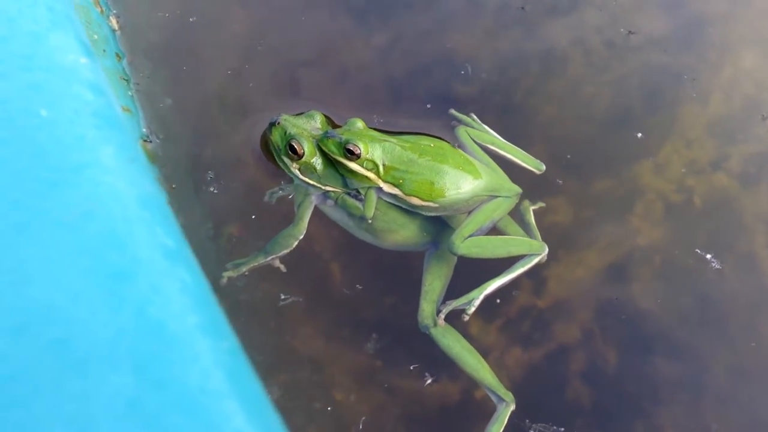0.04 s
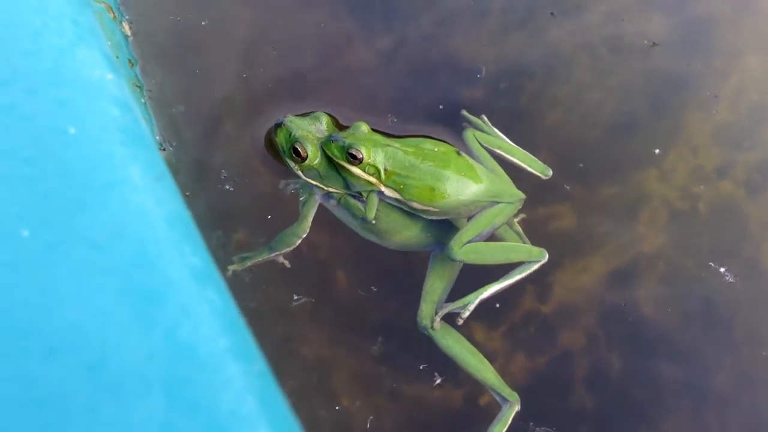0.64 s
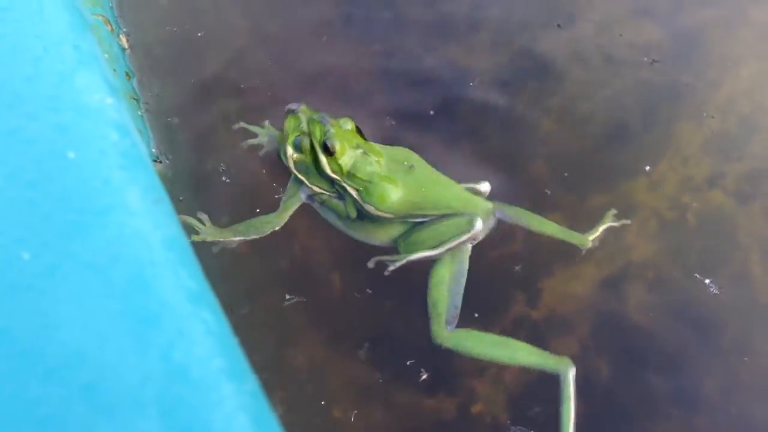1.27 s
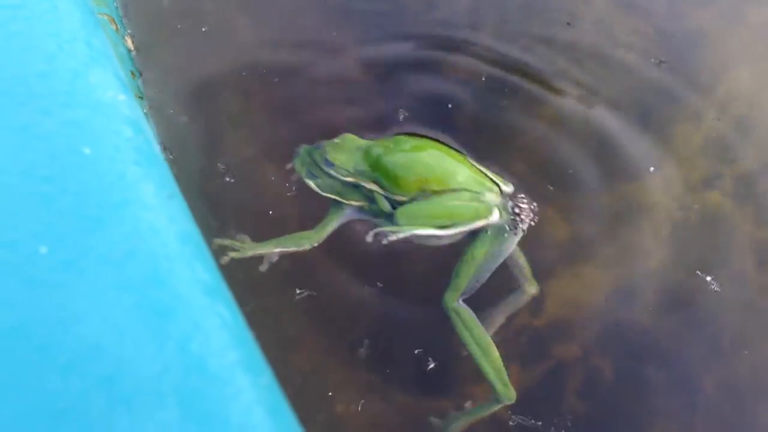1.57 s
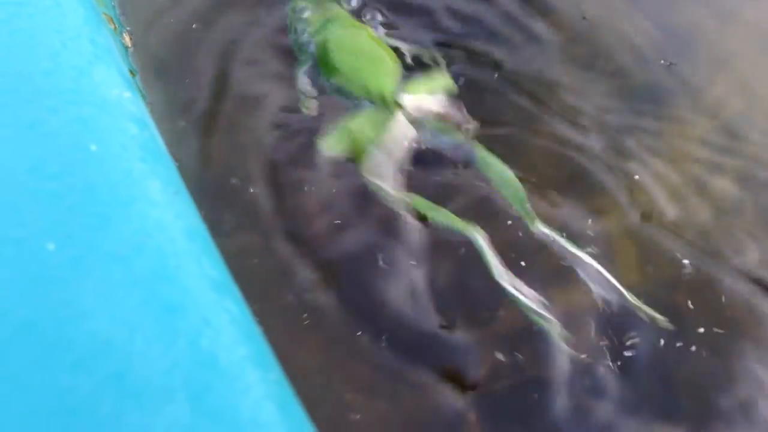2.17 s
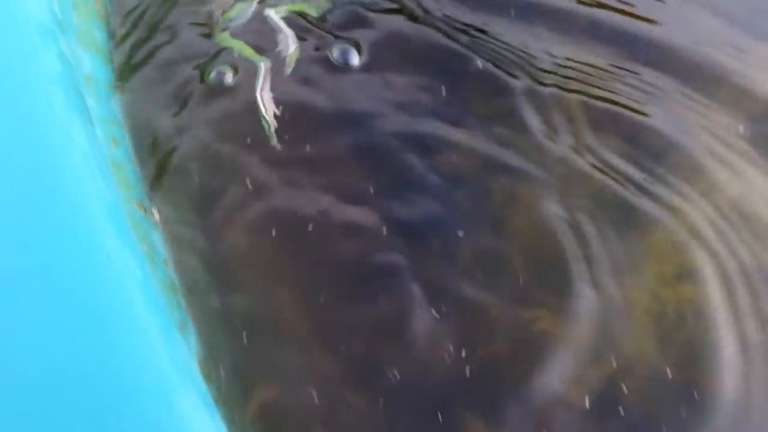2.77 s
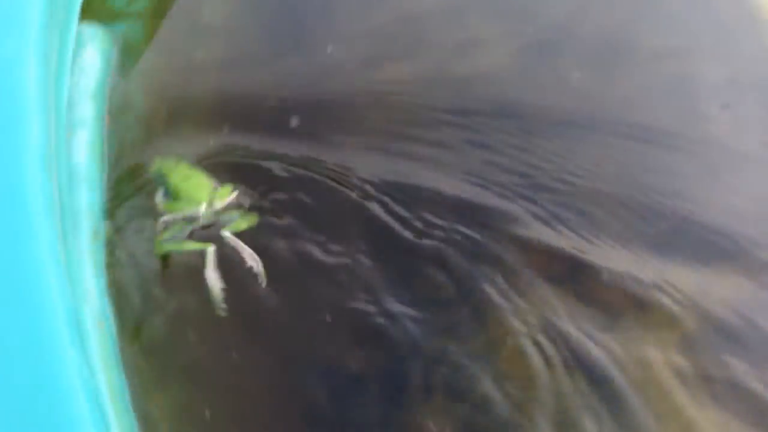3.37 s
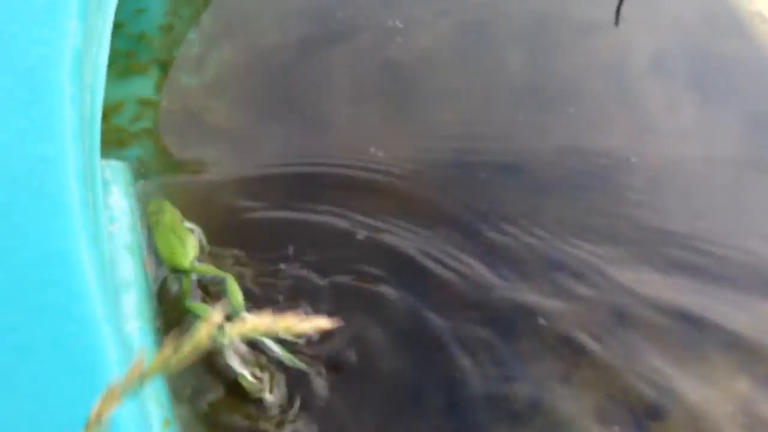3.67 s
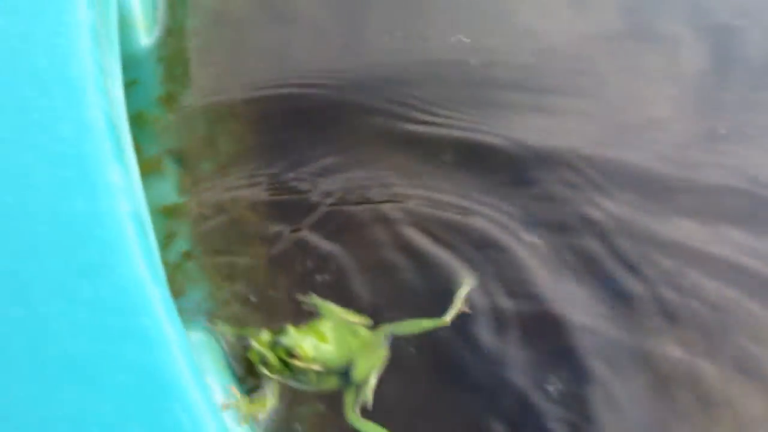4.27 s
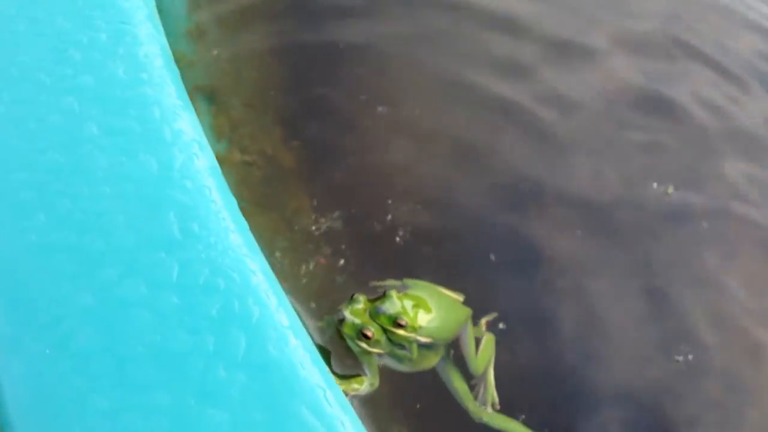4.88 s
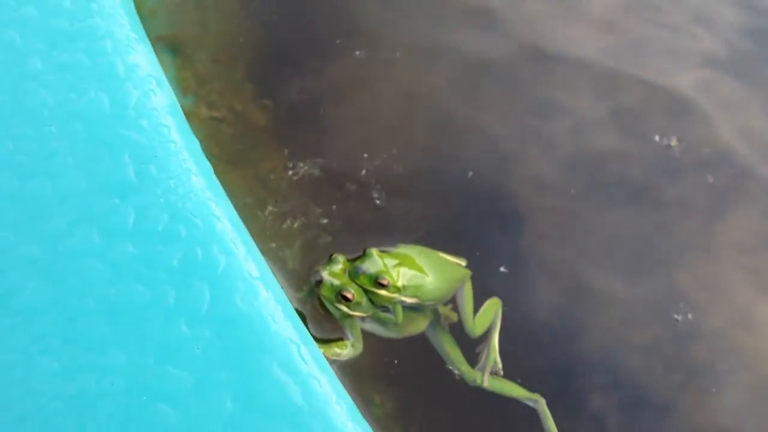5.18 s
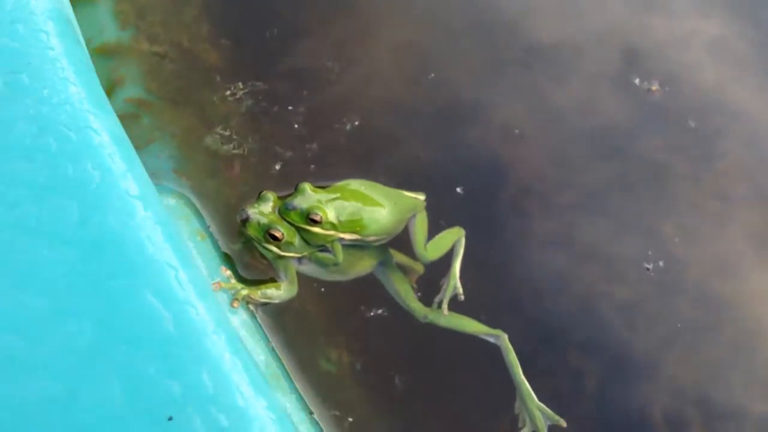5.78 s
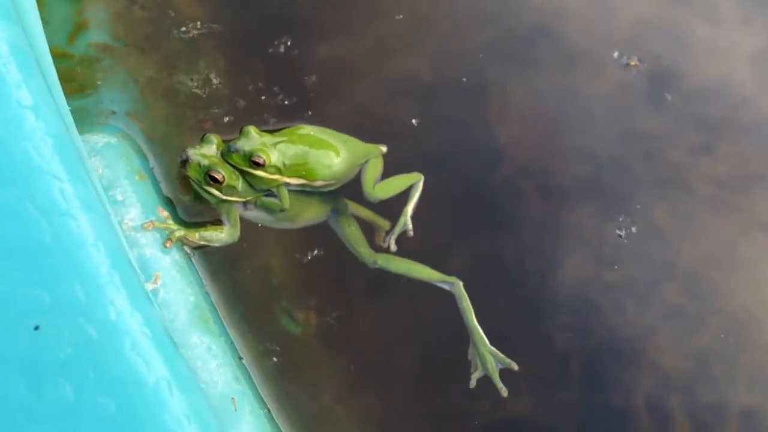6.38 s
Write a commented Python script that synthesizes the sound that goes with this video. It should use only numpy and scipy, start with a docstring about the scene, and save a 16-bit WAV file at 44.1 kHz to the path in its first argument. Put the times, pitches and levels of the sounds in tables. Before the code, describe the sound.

Faint distant birdsong outdoors, a small close plop in a tub of water, then light handling rustle and a faint ticking insect.

```python
"""A quiet garden beside a plastic tub of water: distant birds sing over a low far-off rumble.
Just after two seconds a swimming tree frog's kick traps an air pocket, which rings upward as a plop;
a few small bubbles follow and the tub wall resonates. From about three seconds cloth rustles close to
the microphone, which drifts to the rim as the hand shifts its grip; drops and dry stalks tick.
An insect's ticking, faint at first, has grown by the end, when the birds sing again."""
import sys
import numpy as np
from scipy import signal
from scipy.fft import rfft, irfft, next_fast_len
from scipy.io import wavfile

SR = 44100
rng = np.random.default_rng(int(sys.argv[2]) if len(sys.argv) > 2 else 0)


def log_audio(samples):
    """Write samples as a 16-bit WAV file to the path given in sys.argv[1]."""
    # one column per channel
    frames = np.atleast_2d(samples).T
    # limit to full scale, then quantise
    limited = np.clip(frames, -1, 1)
    pcm = np.round(limited * 32767).astype(np.int16)
    wavfile.write(sys.argv[1], SR, pcm)


N = 292383

# small bubbles in the wake of the kick: start_s, pitch_hz, relative_level_db
WAKE_BUBBLES = [(2.1705, 1780, -28), (2.177, 1710, -31), (2.183, 1490, -35), (2.1842, 2210, -37),
                (2.185, 3080, -41), (2.1914, 2260, -37), (2.198, 1430, -33.5), (2.200, 2510, -43),
                (2.204, 2860, -37.5), (2.2135, 1470, -36.5), (2.2133, 2130, -39), (2.221, 2680, -39.5)]
# tiny bubbles churned up behind the plop: time_s, relative_level_db
CHURN_LEVEL = [(2.135, -100), (2.15, -63), (2.172, -49.5), (2.22, -52), (2.24, -64), (2.30, -110)]
# resonances driven by the bubbles, a broad low body of the plop and two wall modes of the tub: pitch_hz,
# width_hz, gain_db
TUB_MODES = [(429.6, 160, -14), (645, 8.8, -0.5), (743, 8.4, -10)]
# drops and dry stalks, and the bright spit of the plop at 2.1349 s: start_s, peak_db, centre_hz, width_hz
TICK_EVENTS = [(2.0287, -39.5, 2700, 900), (2.1349, -38, 5200, 5000), (3.170, -50, 6500, 4000),
               (3.648, -42, 10000, 6000), (3.652, -41, 11000, 6000), (4.237, -43, 3500, 4000),
               (4.365, -48, 2000, 2000), (4.776, -38, 6500, 4000), (4.812, -42, 4000, 2500),
               (4.847, -35, 12500, 4000), (4.8597, -35, 12500, 3000), (4.862, -36, 12000, 4000)]
# strokes of sliding cloth: peak_s, level_db, swell_s, fade_s
CLOTH_STROKES = [(3.04, -60, 0.053, 0.24), (3.61, -56.5, 0.14, 0.086), (3.652, -53.5, 0.014, .015),
                 (3.85, -54.5, 0.21, 0.097), (4.015, -58, 0.026, 0.036), (4.08, -60, 0.022, 0.025),
                 (4.16, -57, 0.056, 0.09), (4.33, -63, 0.11, .1), (4.532, -45.5, 0.098, 0.071),
                 (4.68, -53.5, 0.076, 0.23), (4.85, -59.5, 0.062, 0.033), (5.89, -60.5, 0.096, 0.084)]
# colour of cloth friction: frequency_hz, relative_density_db
CLOTH_SPECTRUM = [(250, -35), (500, -3), (1200, -4), (2100, 1.5), (2550, -1), (2800, -16.5), (3200, -0.5),
                  (5500, 2), (7200, 2), (8700, -0.5), (11200, 1), (13500, -2.5), (15500, -7)]
# soft bumps of the hand: start_s, peak_db, pitch_hz, rise_s
HAND_BUMPS = [(4.085, -41, 164, 0.006), (4.119, -55.5, 159, 0.0087)]
# the hand shifting its grip: time_s, level_db
GRIP_LEVEL = [(2.0, -89), (3.5, -78), (3.9, -72), (4.2, -66.5), (4.4, -80.5), (4.8, -78), (5.05, -94)]
# songbird chirps: start_s, length_s, final_pitch_hz, upward_swoop_semitones, relative_level_db
BIRD_CHIRPS = [(.037, 0.035, 2840, -7.5, -60.5), (.082, 0.031, 2380, 1, -66), (.168, 0.029, 2880, 9.5, -65),
               (.275, 0.044, 2640, -1.5, -64.5), (.393, 0.041, 3420, 1, -63),
               (.453, 0.056, 1840, -4, -62.5), (.583, 0.028, 2750, 10.5, -63.5),
               (.649, 0.063, 4000, 2.5, -64), (.754, 0.025, 5350, 0, -66), (.802, 0.029, 3380, 2, -60),
               (.86, 0.033, 2064, -6.5, -62), (.915, .027, 2130, 2.5, -67), (1.062, 0.033, 3280, 0.5, -61),
               (1.149, .03, 5240, 1, -64), (2.259, 0.028, 2730, 1, -66), (2.354, 0.032, 2694, 0.4, -58.5),
               (2.402, 0.048, 3100, 1.5, -66.5), (2.526, 0.028, 2560, -1.5, -62.5),
               (2.583, 0.034, 3190, 0.5, -64), (2.892, 0.05, 5810, 1, -60.5),
               (2.925, 0.032, 6800, -3.5, -62), (2.935, 0.023, 2610, 0.5, -60),
               (2.961, .062, 4840, -1, -59), (3.173, 0.065, 5950, 2, -61), (3.249, 0.05, 4810, -0.6, -55),
               (3.314, .06, 4850, 0.5, -63), (3.396, 0.041, 8000, 1.4, -65.5),
               (3.431, 0.038, 6020, 1.5, -58), (3.459, 0.042, 3620, -5, -60),
               (3.633, 0.0286, 6050, 4.5, -51.5), (3.865, 0.042, 5630, -1.5, -57),
               (3.917, 0.076, 3880, 0, -56), (3.974, 0.046, 3410, -5.5, -60),
               (4.143, .053, 5620, -3.7, -61), (4.197, 0.093, 3890, 0.2, -57),
               (4.714, 0.058, 3210, -1.4, -61.5), (4.776, 0.025, 3180, 0.6, -55.5),
               (5.545, 0.048, 3117, -3.5, -60), (5.629, .049, 2950, -4.5, -63.5),
               (6.163, 0.034, 4380, 6, -57.5), (6.25, .045, 2170, -1, -64.5),
               (6.285, .035, 2330, 0.5, -61.5), (6.462, 0.04, 2440, -2, -65.5),
               (6.545, .035, 2060, -1, -62), (6.575, .03, 2220, 2, -64)]
# spells of song that hold fainter chirps: start_s, end_s
SONG_SPELLS = [(0, 1.2), (2.199, 4.3), (5.4, 6.6)]
# another bird's rising whistles: start_s, length_s, start_pitch_hz, relative_level_db
BIRD_WHISTLES = [(2.652, 0.1, 2280, -67), (2.88, 0.15, 2135, -63.5), (3.006, .11, 2460, -63.5),
                 (3.663, 0.23, 1625, -69.5), (3.894, .13, 2324, -63.5)]
# the ticking insect: time_s, relative_level_db
INSECT_LEVEL = [(0, -80.5), (4.4, -64), (4.95, -63.5), (6.63, -62)]
# far-off rumble: time_s, relative_level_db
RUMBLE_LEVEL = [(0.0, -61), (0.44, -63), (0.87, -66.5), (1.09, -65.5), (1.51, -64.5), (2.05, -60.5),
                (2.38, -65), (3.55, -69), (4.15, -65.5), (4.34, -67.5), (4.8, -68.5), (5.28, -63.5),
                (5.69, -66), (6.63, -67)]
# steady bands of a hum and far insects: centre_hz, width_hz, level_db
DRONE_BANDS = [(128, 14.5, -70), (4954, 340, -78), (5566, 144, -76.5), (5970, 80, -79)]
# relative spectral density of the garden: frequency_hz, over_water_db, at_rim_db
GARDEN_SPECTRA = [(25.4, -19.5, -11.5), (65, -1, -5), (125.6, 2, -0.5), (199, -8.5, -6.5),
                  (313, -18.5, -17.5), (701, -20.5, -22), (1270, -23.5, -29.5), (2020, -25, -22),
                  (3376, -20, -23.5), (3880, -22, -24), (6040, -22, -24), (6390, -25.5, -29),
                  (10000, -28.5, -30.5), (15500, -30, -31)]
# the microphone's drift to the rim: time_s, fraction_of_way
RIM_APPROACH = [(2.6, 0), (4.6, 0.85)]


def plop(start_s=2.1347, deep_hz=1085, surface_hz=2600, climb_s=0.0505, hold_s=0.0305, t60_s=0.034):
    """Bubble resonance: trapped air is a spring, water its mass; as the water above thins, pitch rises."""
    pinch_s, surge_s, fade_s = 0.0001, 0.0055, 0.0061
    ring_db, surge_db, crack_db = -21, 3.0, -17
    t = np.arange(0, hold_s + t60_s, 1 / SR)
    risen = np.sin(np.pi / 2 * np.minimum(t / climb_s, 1)) ** 2
    hz = deep_hz * (surface_hz / deep_hz) ** risen
    release = np.exp(-np.log(1000) * np.maximum(t - hold_s, 0) / t60_s)
    level = from_db(ring_db + surge_db * np.exp(-(t / surge_s) ** 2)) * release
    fade = np.clip((t[-1] - t) / fade_s, 0, 1)
    ring = level * (1 - np.exp(-t / pinch_s)) * fade * glide(hz)
    crack = cut(resonate(signal.unit_impulse(len(t)), hz=1800, width_hz=650), 3600, "low")  # pinch-off
    out = np.zeros(N)
    add(out, start_s, ring + level[0] * from_db(crack_db) * crack / crack.max())
    return out * from_db(1.45 * drift(301))  # the level quivers


def bubbles(pinch_s=0.0017, t60_s=0.024, rise_oct_per_s=21.5, snap_db=-9):
    """Damped oscillation: each small bubble pinches off with a dull snap and decays on a rising note."""
    out, t = np.zeros(N), np.arange(int(t60_s * SR)) / SR
    envelope = np.exp(-np.log(1000) * t / t60_s) * (1 - np.exp(-t / pinch_s))
    snap = resonate(signal.unit_impulse(len(t)), hz=1100, width_hz=1500)
    snap = cut(snap / snap.max(), 2200, "low")
    for start_s, hz, db in WAKE_BUBBLES:
        ring = envelope * glide(hz * 2 ** (rise_oct_per_s * t))
        add(out, start_s, from_db(db) * (ring + from_db(snap_db) * snap))
    return out


def churn(births_per_s=1200, low_hz=1400, high_hz=3300, quality=9, sizes=14):
    """Random excitation: tiny bubbles are born in a crowd, each ringing briefly at the pitch of its size."""
    births = rng.standard_normal(N) * (rng.random(N) < births_per_s / SR)
    size = rng.integers(0, sizes, N)
    rings = sum(resonate(births * (size == k) + 1e-18, hz, hz / quality) / hz
                for k, hz in enumerate(np.linspace(low_hz, high_hz, sizes)))
    return rms_one(cut(rings, high_hz, "low")) * from_db(in_time(CHURN_LEVEL)[0])


def water(band_hz=(830, 3300), echo_db=-27):
    """Forced vibration: bubbles drive the wall modes; their middle band is heard and echoes in the tub."""
    rings = plop() + bubbles() + churn()
    direct = signal.sosfilt(signal.butter(4, band_hz, "band", fs=SR, output="sos"), rings)
    wall = sum(from_db(db) * resonate(rings, hz, width_hz) for hz, width_hz, db in TUB_MODES)
    return direct + wall + from_db(echo_db) * echoes(direct, t60_s=0.1, gap_s=0.0039)


def ticks():
    """Impulse response: each tick, from a drop, a dry stalk or the plop's spit, strikes one heavily damped
    resonance."""
    out = np.zeros(N)
    for start_s, db, hz, width_hz in TICK_EVENTS:
        snap = resonate(signal.unit_impulse(SR // 100), hz, width_hz)
        add(out, start_s, from_db(db) * snap / np.abs(snap).max())
    return out


def rustle(catches_per_s=420, catch_db=-6, clump_db=5, uneven_db=1.27):
    """Stick-slip friction: sliding fibres hiss, and some catch and let go in clumps of tiny clicks."""
    sizes = from_db(4 * np.minimum(rng.exponential(1, N), 3)) * rng.choice([-1, 1], N)
    caught = rng.random(N) < catches_per_s * from_db(clump_db * drift(25)) / SR
    friction = rng.standard_normal(N) + from_db(catch_db) * rms_one(sizes * caught)
    return coloured(friction, CLOTH_SPECTRUM) * cloth_envelope() * from_db(uneven_db * drift(31))


def cloth_envelope(roundness=1.6):
    """Incoherent addition: each stroke swells and fades, and overlapping strokes add in power."""
    t, power = np.arange(N) / SR, 0
    for peak_s, db, swell_s, fade_s in CLOTH_STROKES:
        from_peak = np.maximum((peak_s - t) / swell_s, (t - peak_s) / fade_s)
        power += (from_db(db) * np.exp(-np.minimum(from_peak, 10) ** roundness)) ** 2
    return np.sqrt(power)


def bumps():
    """Soft impact: a touch of the hand swells and dies within a few low cycles."""
    out, t = np.zeros(N), np.arange(SR // 10) / SR
    for start_s, db, hz, rise_s in HAND_BUMPS:
        swell = t / rise_s * np.exp((1 - (t / rise_s) ** 2) / 2)
        add(out, start_s, from_db(db) * swell * np.sin(2 * np.pi * hz * t))
    return out


def grip(hz=260, width_hz=200, lumpy_db=3):
    """Structure-borne sound: shifting fingers send a dull, lumpy rub through the microphone's case."""
    rub = resonate(resonate(rng.standard_normal(N), hz, width_hz), hz, 2 * width_hz)
    return rms_one(rub) * from_db(in_time(GRIP_LEVEL)[0] + lumpy_db * drift(20))


def birds(waver=0.009, flutter_db=1.65, direct_db=2.5, scatter_hz=5000):
    """Scattering: wavering notes arrive directly and as echo, the high ones more as echo."""
    song, wobble = np.zeros(N), 1 + waver * drift(135)
    for start_s, hz, db in bird_notes():
        progress = np.linspace(0, 1, len(hz))
        envelope = np.sqrt(np.abs(np.sin(np.pi * progress ** 0.76)))  # swells early, then tapers
        hz = hz * wobble.take(int(start_s * SR) + np.arange(len(hz)), mode="wrap")
        add(song, start_s, from_db(db) * envelope * glide(hz))
    song *= from_db(flutter_db * drift(56))
    direct = signal.sosfilt(signal.butter(1, scatter_hz, fs=SR, output="sos"), song)
    return from_db(direct_db) * direct + echoes(song, t60_s=0.24, gap_s=0.0031)


def bird_notes(whistle_oct_per_s=1.9):
    """Frequency modulation: chirps swoop fast and settle on their pitch; whistles climb evenly."""
    for start_s, length_s, hz, swoop, db in list(BIRD_CHIRPS) + faint_chirps():
        swoop_left = np.linspace(1, 0, int(length_s * SR)) ** 2
        yield start_s, hz * 2 ** (-swoop * swoop_left / 12), db
    for start_s, length_s, hz, db in BIRD_WHISTLES:
        t = np.arange(int(length_s * SR)) / SR
        yield start_s, hz * 2 ** (whistle_oct_per_s * t), db


def faint_chirps(per_spell=8, length_s=0.0345, low_hz=2600, high_hz=5200, swoop_semitones=4, db=-70):
    """A random process: weak chirps vary in time, pitch and swoop within each spell of song."""
    return [(start_s + when * (end_s - start_s), length_s, low_hz * (high_hz / low_hz) ** height,
             swoop_semitones * (2 * lean - 1), db)
            for start_s, end_s in SONG_SPELLS for when, height, lean in rng.random((per_spell, 3))]


def insect(top_hz=5230, bottom_hz=4650, stroke_s=0.013, period_s=0.0185, rest_s=0.012, uneven_db=1.3):
    """Stridulation: wing strokes come in threes and fours, each a short falling chirp."""
    out, start_s = np.zeros(N), 0
    progress = np.linspace(0, 1, int(stroke_s * SR))
    stroke = np.sin(np.pi * progress) * glide(top_hz + (bottom_hz - top_hz) * progress)
    for chance, *strengths in rng.random((200, 5)):
        for strength in strengths[:4 if chance < 0.3 else 3]:
            add(out, start_s, stroke * from_db(uneven_db * (2 * strength - 0.5)))
            start_s += period_s * (1 + 0.12 * (strength - 0.5))
        start_s += rest_s
    return out * from_db(in_time(INSECT_LEVEL)[0])


def garden(split_hz=300, rumble_lift_db=1.2, swell_db=1.7, hiss_db=-64, restless_db=0.47):
    """Ambient noise in bands: a swelling low rumble, even hiss above it, and narrow steady drones."""
    rumble = rms_one(cut(garden_noise(), split_hz, "low"))
    hiss = rms_one(cut(cut(garden_noise(), split_hz, "high"), split_hz / 2, "high"))
    drones = 0
    for hz, width_hz, db in DRONE_BANDS:
        band = resonate(rng.standard_normal(N), hz, 2 * width_hz)
        drones += from_db(db) * rms_one(resonate(band, hz, 2 * width_hz))
    rumble *= from_db(in_time(RUMBLE_LEVEL)[0] + rumble_lift_db + swell_db * drift(5))
    hiss *= from_db(hiss_db + restless_db * drift(4.2))
    return rumble + hiss + drones


def garden_noise():
    """Equal-power mixing: the background changes colour as the microphone nears the rim."""
    nearness = np.clip(in_time(RIM_APPROACH)[0], 0, 1)
    spectra = np.array(GARDEN_SPECTRA)
    over_water, at_rim = (coloured(rng.standard_normal(N), spectra[:, [0, k]]) for k in (1, 2))
    return np.sqrt(1 - nearness) * over_water + np.sqrt(nearness) * at_rim


def echoes(x, t60_s, gap_s):
    """Reverberation: after a gap, many weak reflections decay exponentially."""
    t = np.arange(SR) / SR
    response = rng.standard_normal(SR) * np.exp(-np.log(1000) * t / t60_s) * (t > gap_s)
    return signal.fftconvolve(x, response / np.linalg.norm(response))[:N]


def resonate(x, hz, width_hz):
    """A damped resonance with unit gain at its peak."""
    r = np.exp(-np.pi * width_hz / SR)
    feedback = [1, -2 * r * np.cos(2 * np.pi * hz / SR), r * r]
    return signal.lfilter(np.array([1, 0, -1]) * (1 - r * r) / 2, feedback, x)


def glide(hz):
    """A sine whose phase is the integral of its frequency."""
    return np.sin(2 * np.pi * np.cumsum(hz) / SR)


def cut(x, hz, kind):
    """A second-order low- or high-pass filter."""
    return signal.sosfilt(signal.butter(2, hz, kind, fs=SR, output="sos"), x)


def coloured(x, spectrum):
    """Spectral shaping: noise takes the given colour, at rms 1."""
    hz, db = np.transpose(spectrum)
    size = next_fast_len(N)
    bins_hz = np.maximum(np.fft.rfftfreq(size, 1 / SR), 1)
    gain = from_db(np.interp(np.log(bins_hz), np.log(hz), db))
    return rms_one(irfft(rfft(x, size) * gain, size)[:N])


def drift(rate_hz, step=40, settle=2000):
    """Low-passed noise: a slow random wander with spread 1."""
    r = np.exp(-2 * np.pi * step * rate_hz / SR)
    noise = rng.standard_normal(N // step + settle + 2)
    slow = signal.lfilter([1], [1, -2 * r, r * r], noise)[settle:]
    return np.interp(np.arange(N) / step, np.arange(len(slow)), rms_one(slow))


def in_time(rows):
    """Linear interpolation of a curve's columns at every sample."""
    time_s, *columns = np.transpose(rows)
    return [np.interp(np.arange(N) / SR, time_s, column) for column in columns]


def add(out, start_s, sound):
    """Superpose a sound from start_s on."""
    at = int(np.clip(round(start_s * SR), 0, N))
    out[at:at + len(sound)] += sound[:N - at]


def from_db(db):
    """Decibels to amplitude ratio."""
    return 10 ** (np.asarray(db) / 20)


def rms_one(x):
    """Normalise to rms 1."""
    return x / np.sqrt(np.mean(x ** 2) + 1e-20)


def scene(insect_direct_db=1.0, insect_echo_db=-9):
    """Superposition: water, hand and cloth are close; birds and insect echo out in the garden."""
    wings = insect()
    wing_echo = echoes(wings, t60_s=0.32, gap_s=0.0054)
    trill = from_db(insect_direct_db) * wings + from_db(insect_echo_db) * wing_echo
    return (water() + ticks() + bumps() + grip() + rustle() + birds() + trill + garden())[None]


def record(dry, low_hz=28, high_hz=15400):
    """Band limiting: the microphone loses the deepest bass, and the top is cut steeply."""
    low_pass = signal.ellip(12, 0.1, 70, high_hz, fs=SR, output="sos")
    return signal.sosfilt(low_pass, cut(dry, low_hz, "high"))


dry = scene()
out = record(dry)
log_audio(out)
```